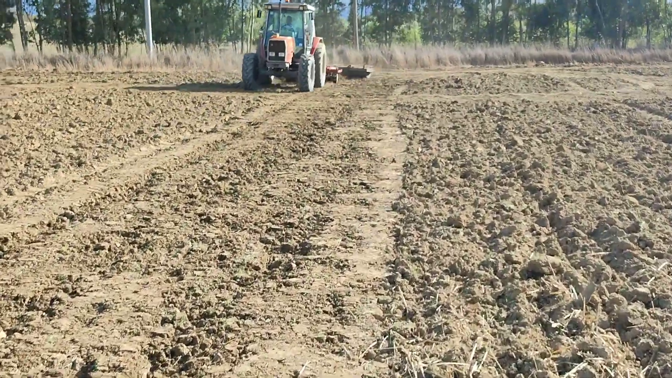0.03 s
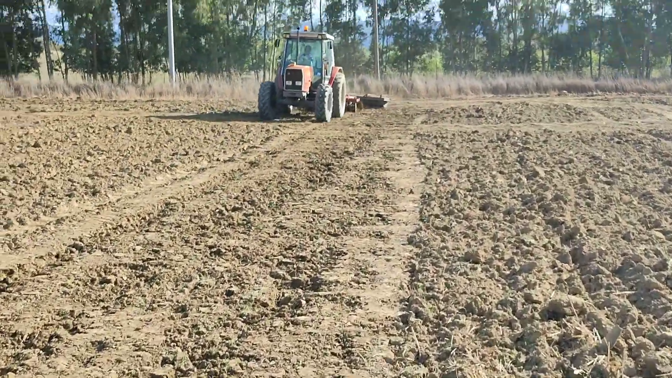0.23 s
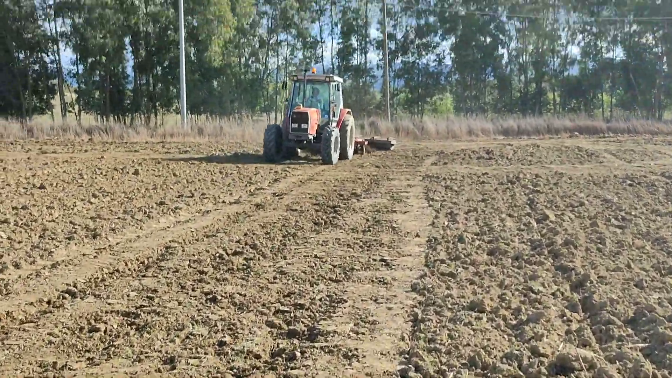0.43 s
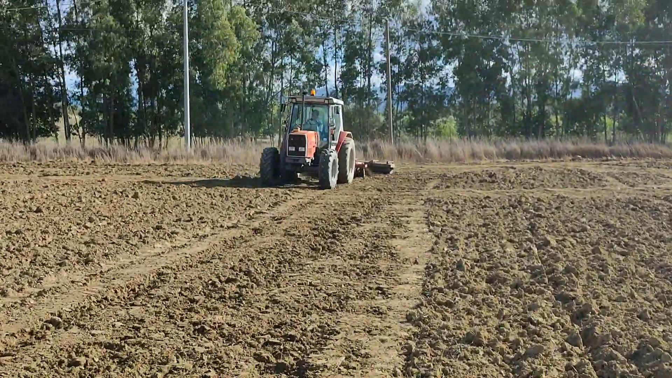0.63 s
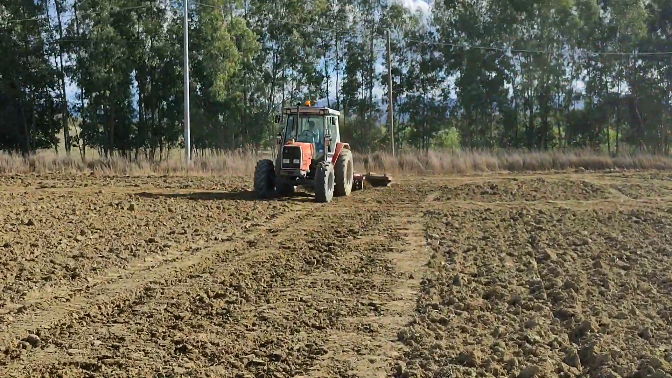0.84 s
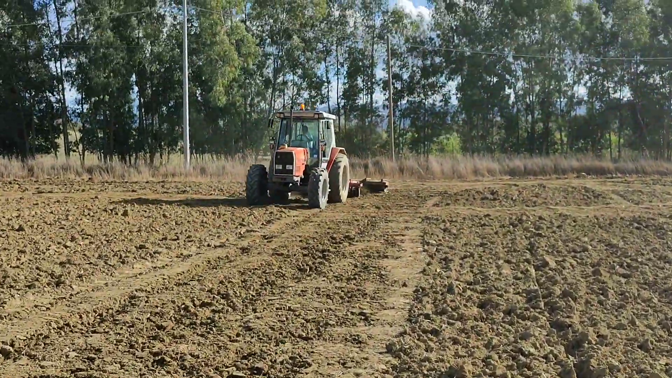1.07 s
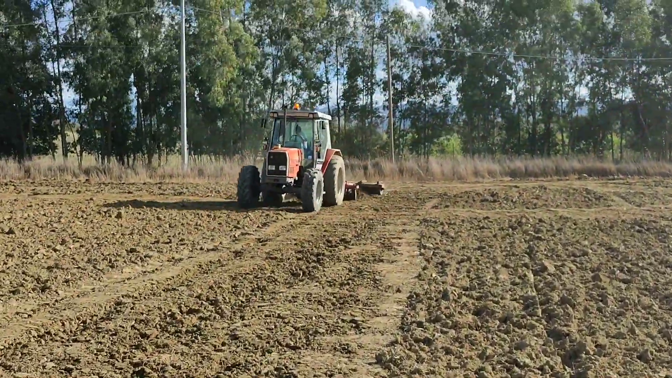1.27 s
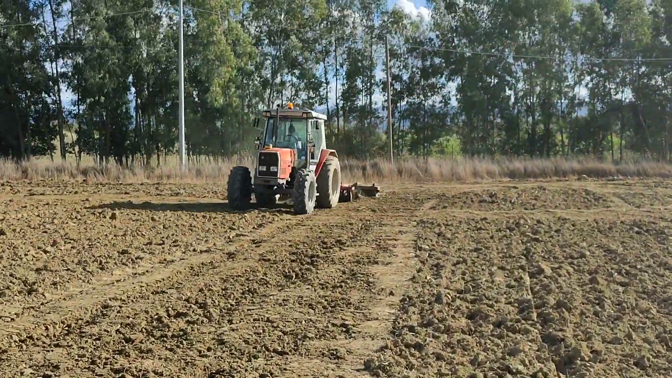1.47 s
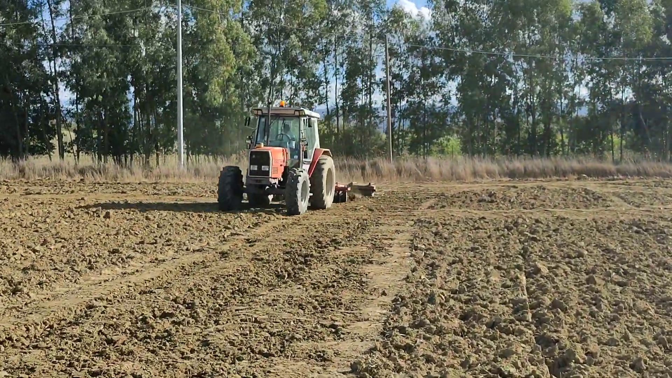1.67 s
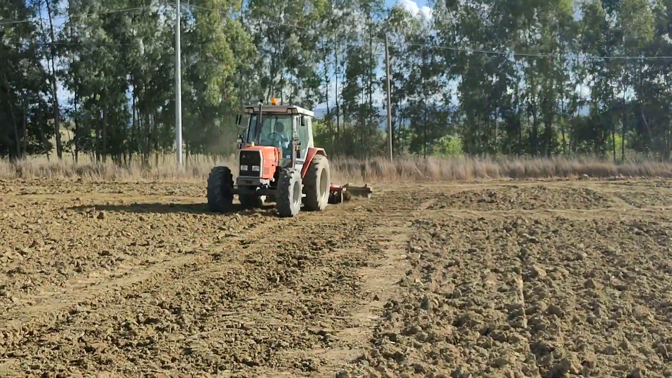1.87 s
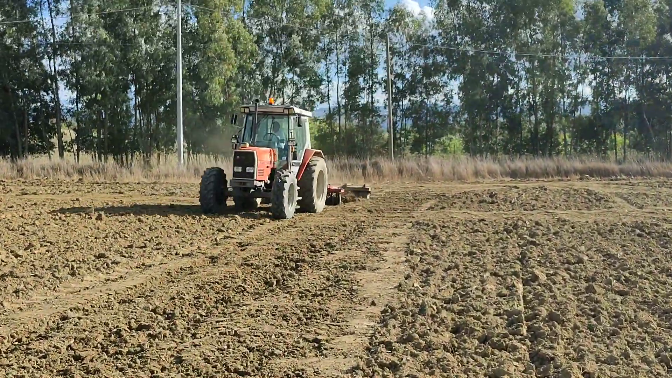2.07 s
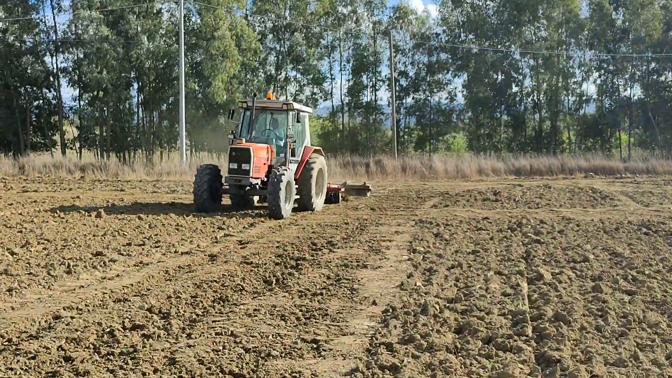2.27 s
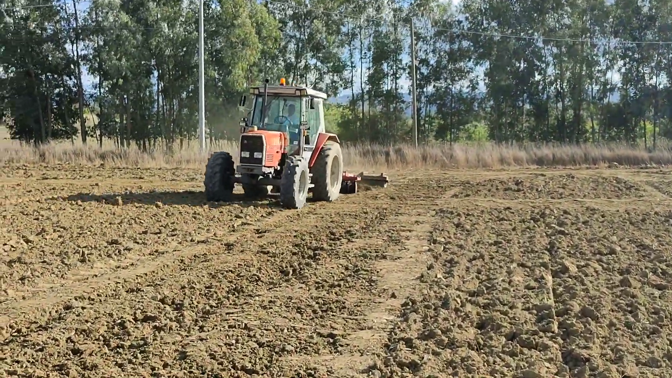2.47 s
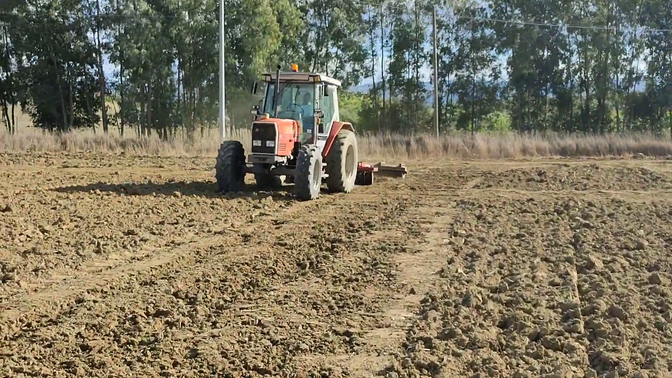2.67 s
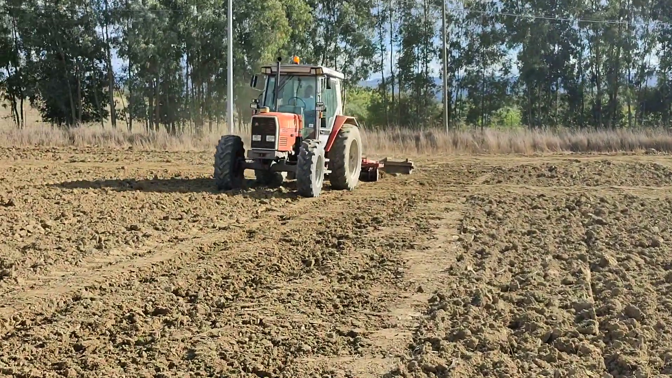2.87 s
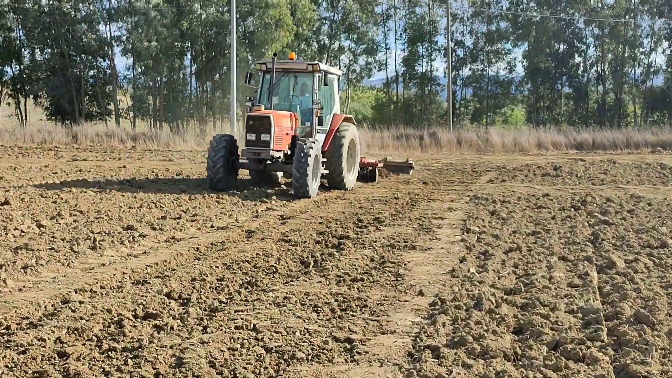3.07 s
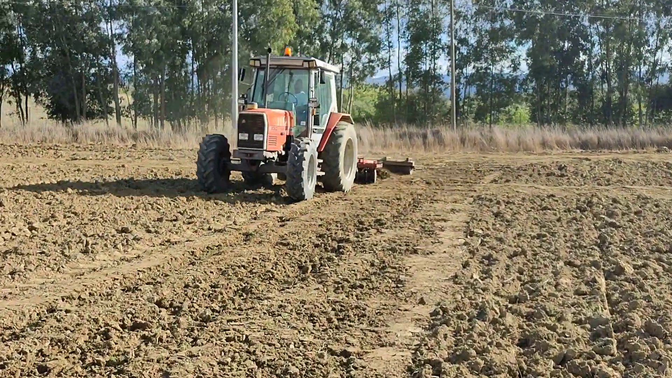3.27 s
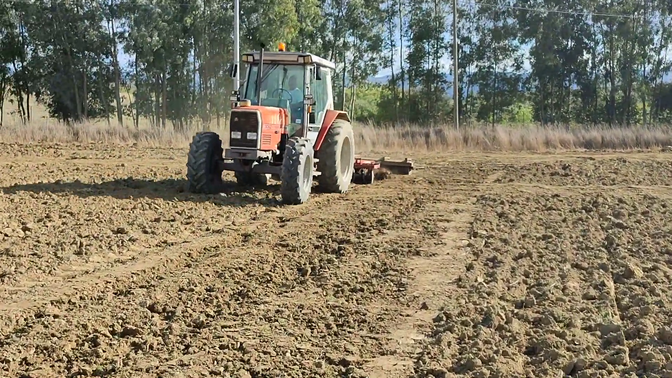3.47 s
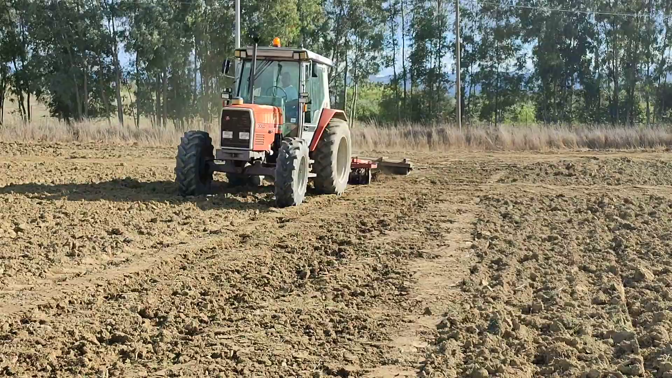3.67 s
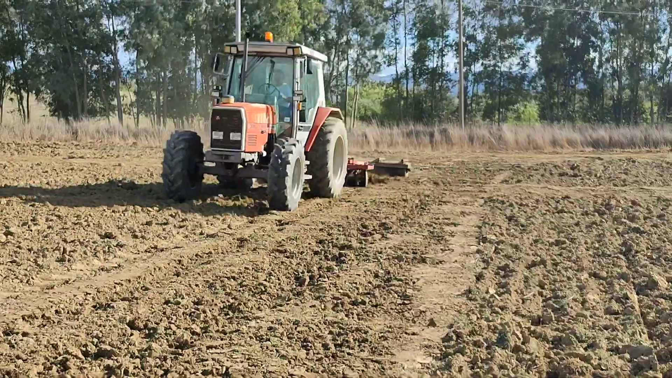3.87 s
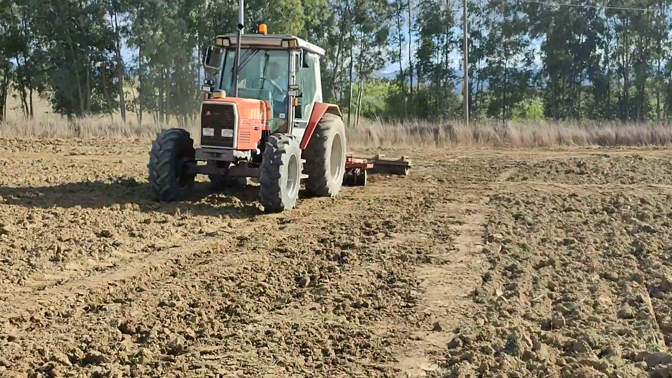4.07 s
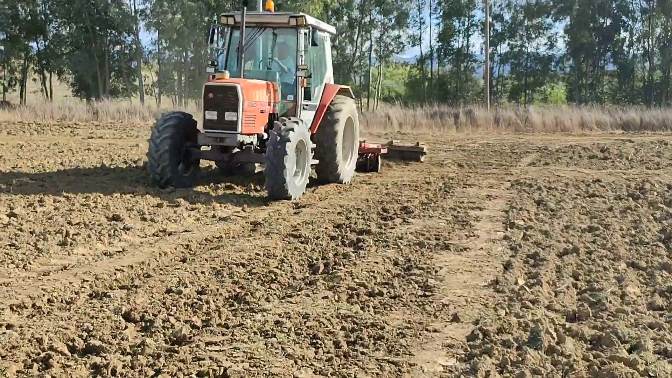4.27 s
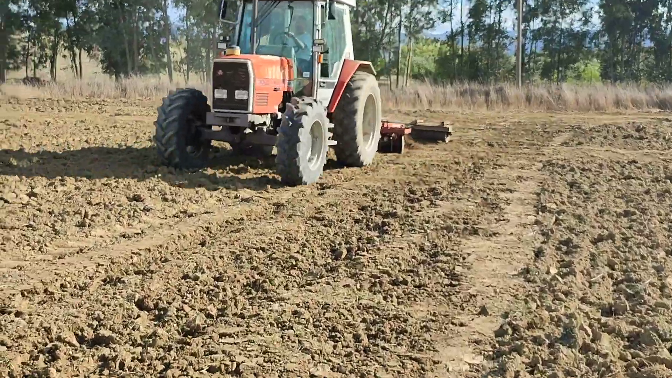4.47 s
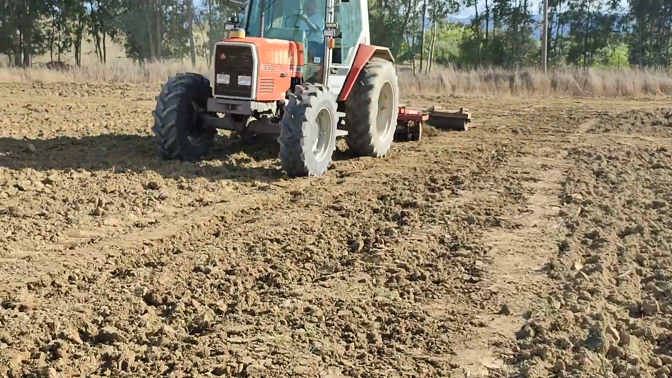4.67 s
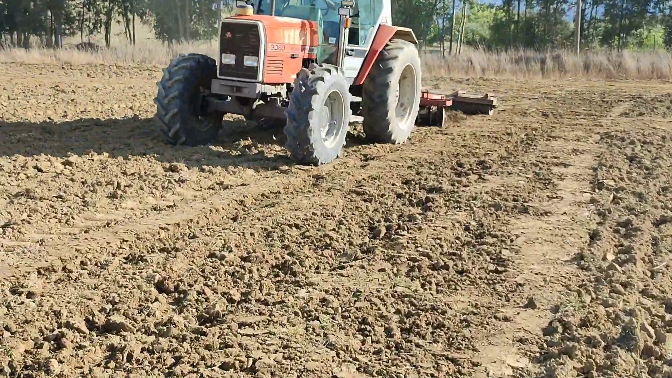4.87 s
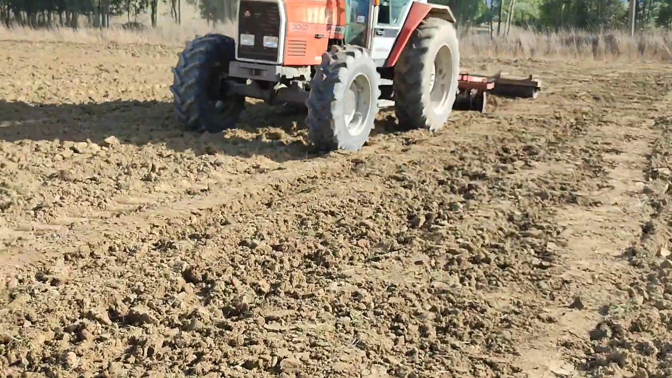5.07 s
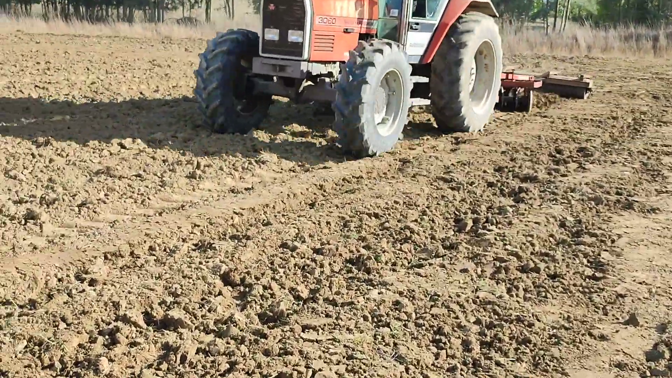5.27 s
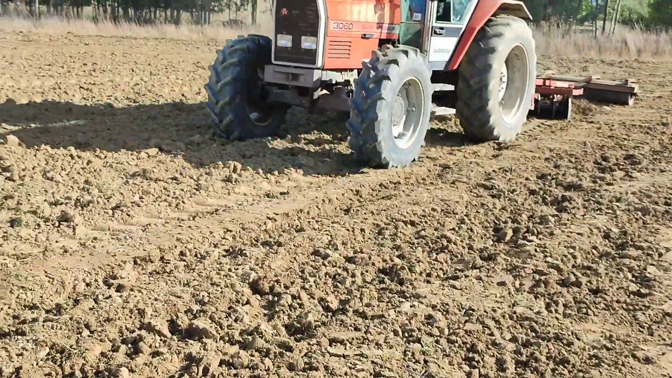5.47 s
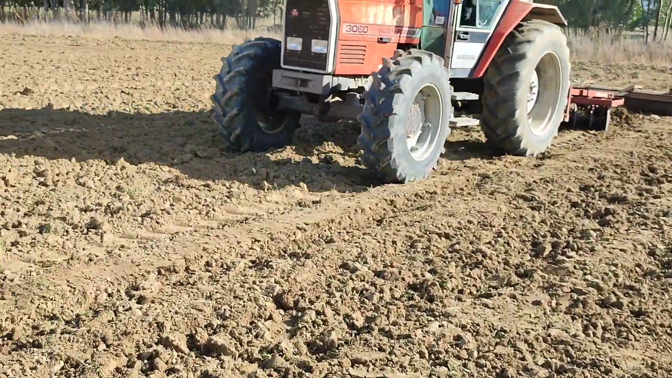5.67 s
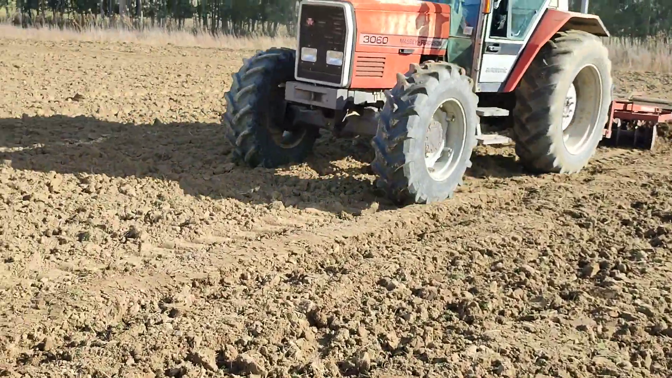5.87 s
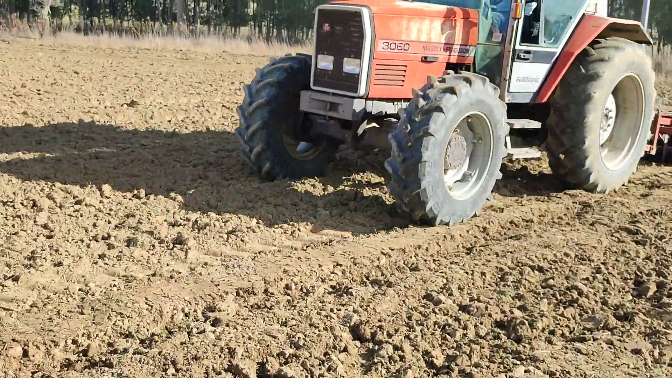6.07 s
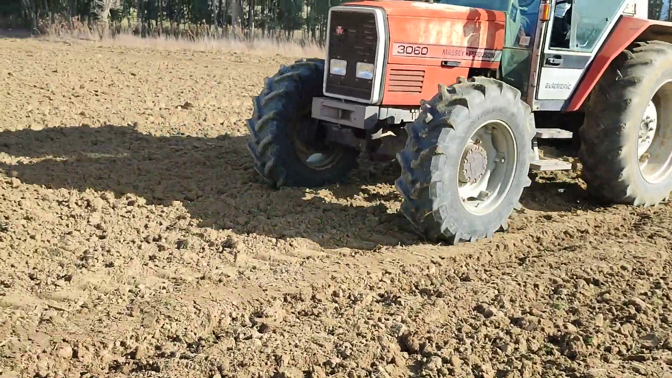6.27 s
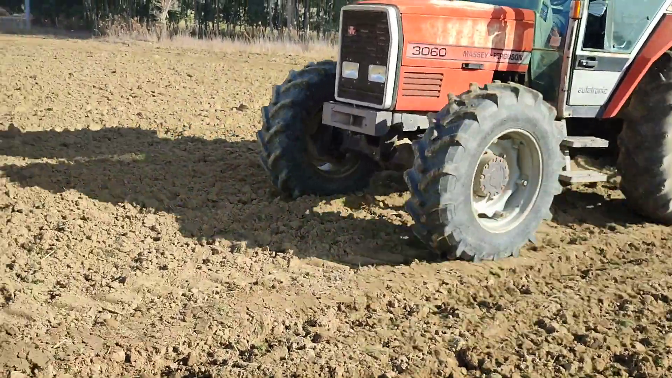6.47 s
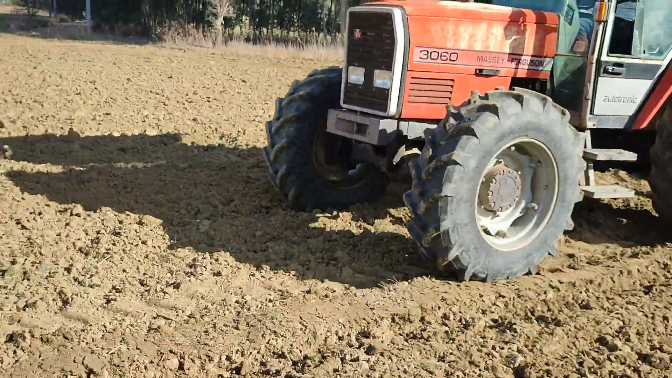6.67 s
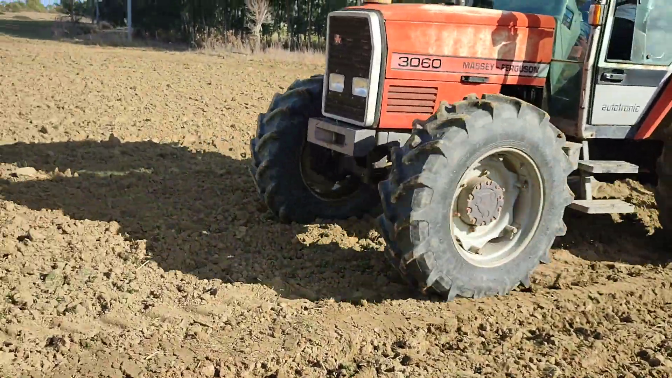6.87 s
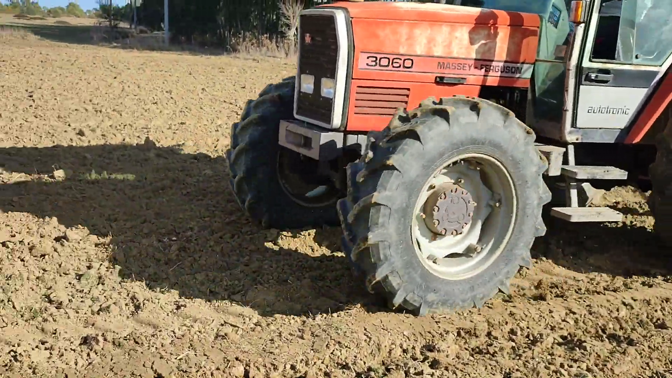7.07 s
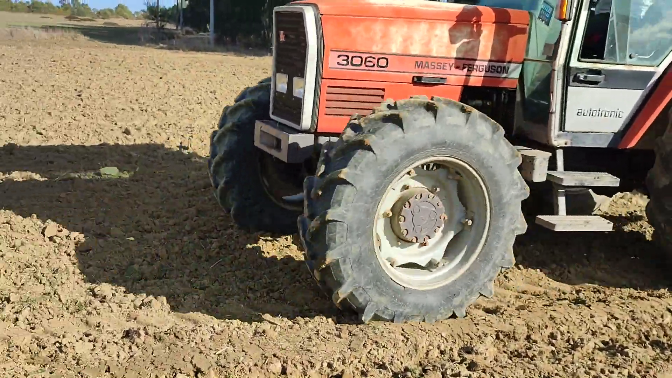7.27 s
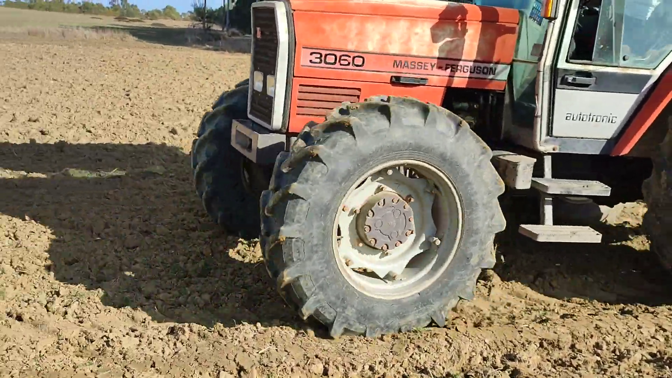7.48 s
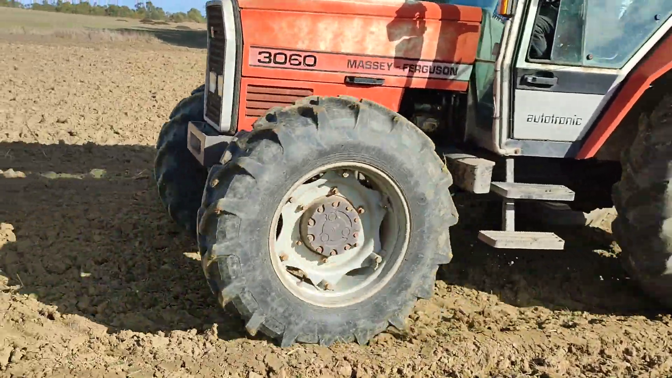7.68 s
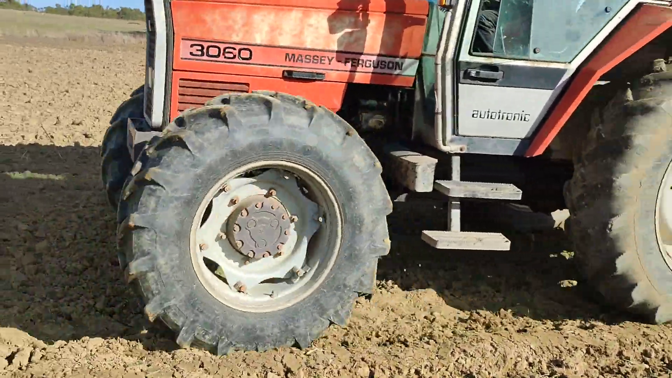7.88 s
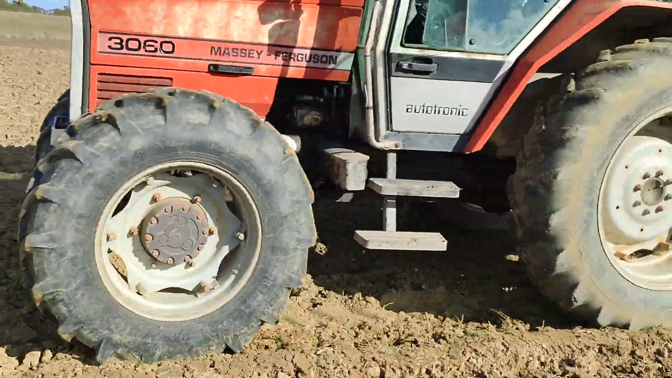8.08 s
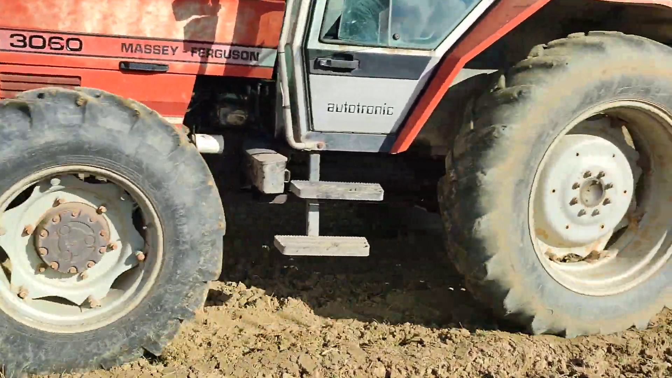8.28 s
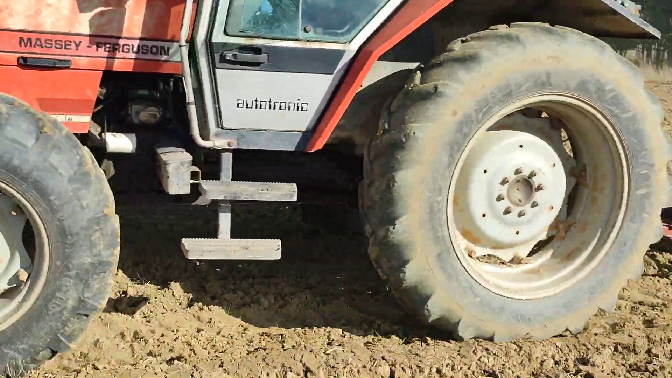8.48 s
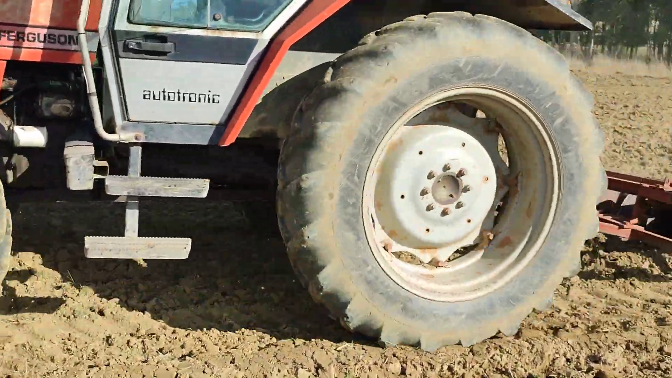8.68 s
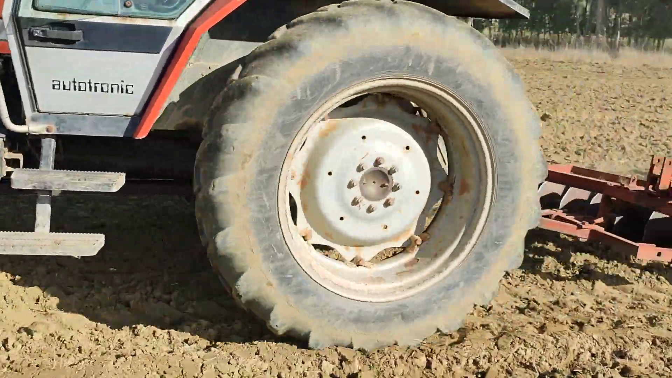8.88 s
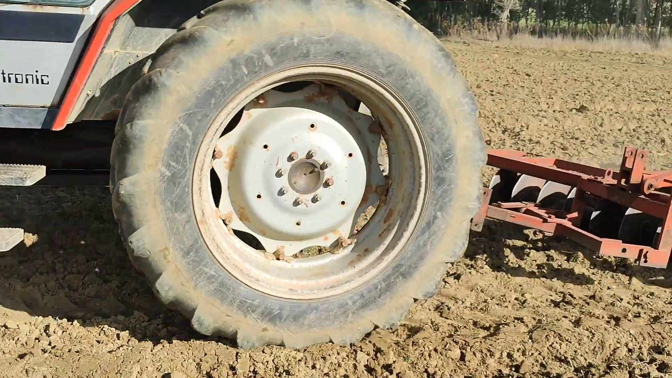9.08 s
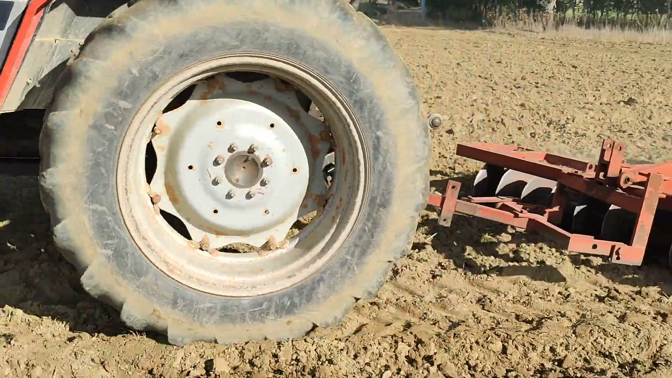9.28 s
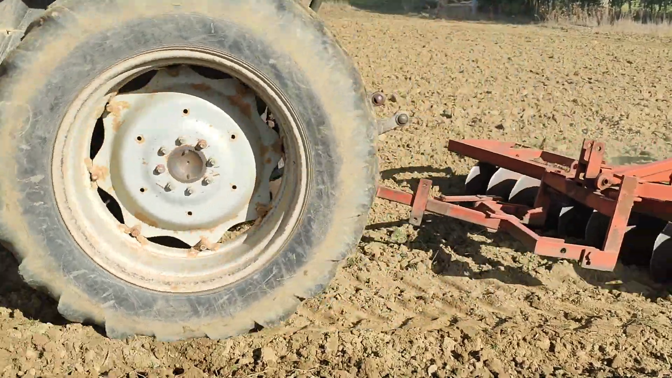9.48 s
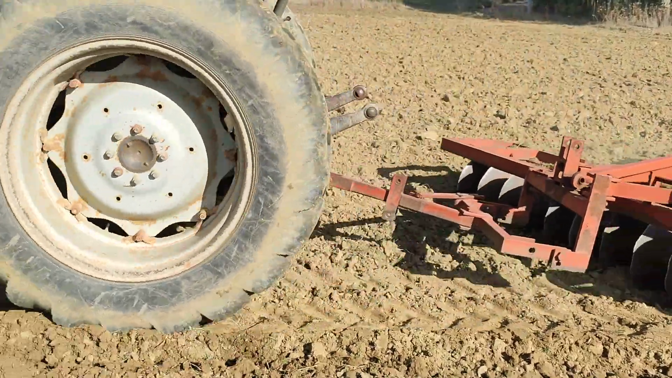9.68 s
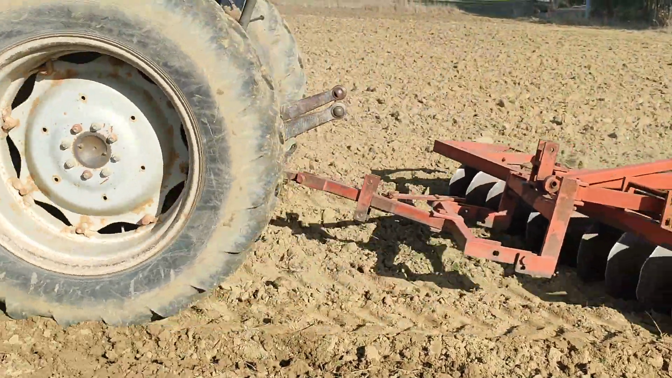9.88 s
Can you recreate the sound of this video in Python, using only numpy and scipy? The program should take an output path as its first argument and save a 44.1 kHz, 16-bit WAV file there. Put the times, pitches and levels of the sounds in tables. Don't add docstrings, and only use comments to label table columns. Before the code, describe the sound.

Hand-held microphone facing an approaching farm tractor on ploughed ground. A constant low exhaust hum with quick diesel clatter swells from distant to close. Rough wind buffeting covers it in bursts, strongest through the middle, with a few dull slaps on the left. Metallic ticks and a faint gear whine join up close, followed by a short rise in revs and a duller, settling engine as it passes.

```python
import sys
import numpy as np
from scipy import signal
from scipy.fft import rfft, irfft
from scipy.io import wavfile
from scipy.ndimage import uniform_filter1d, map_coordinates

SR = 44100
rng = np.random.default_rng(int(sys.argv[2]) if len(sys.argv) > 2 else 0)


def transcribe(u):
    v = np.clip(np.atleast_2d(u).T, -1, 1)
    q = np.round(v * 32767).astype(np.int16)
    wavfile.write(sys.argv[1], SR, q)


def ratio(d):
    e = np.asarray(d, float) / 20
    return 10 ** e


N = 437455
TIME = np.arange(N) / SR
HZ = np.maximum(np.arange(N // 2 + 1) * SR / N, 1)

# time_s, firing_hz
ENGINE_SPEED = [(0.0, 59.45), (0.6, 58.61), (1.2, 58.78), (2.0, 58.38), (3.0, 58.37), (4.0, 58.55),
                (5.0, 58.03), (6.0, 57.83), (7.0, 58.29), (7.7, 58.27), (8.05, 58.19), (8.25, 60.25),
                (8.45, 61.84), (8.7, 64.75), (8.84, 65.18), (9.0, 59.96), (9.3, 59.13), (9.92, 57.36)]
GOVERNED_HZ, SURGE_S = 58.4, 8.27
FIRST_TURN, CLATTER_LEAD = .29, .25
# time_s, distance_m, flank_share (side turned to the camera, 0-1)
APPROACH = [(0, 18.2, 0), (1, 16.4, 0), (2, 12.5, 0), (3, 10.8, 0), (4, 8.6, 0.1), (4.7, 6.95, 0.13),
            (5.2, 5.6, 0.45), (6, 4.73, 0.5), (6.6, 4.93, 0.52), (6.9, 4.04, 0.77), (7.6, 3.74, 0.87),
            (8.2, 3.1, 0.93), (9, 3.3, 0.59), (9.92, 4.18, 1)]
NEAREST_M = 3
BEHIND_CAB_S, BEHIND_FADE_S = 8.87, 0.024

EXHAUST_PHASES = [0.34, 1.7, 2.32, 1.27, 0.3]
# nearest_db, distance_loss_share, flank_db, surge_db_per_hz, behind_cab_db
EXHAUST_LEVELS = [
    (-15.5, 0.86, 0.4, -0.2, -2),
    (-27, 0.76, -13, 1.5, -8),
    (-45.5, 0.4, 19.5, 1.5, 2),
    (-43, 0.34, 26, 0.28, -3),
    (-35, 1.37, 9.5, -1.3, -8.5),
]
BEAM_POWERS = [1.1, 2.2, 1.12, 1.03, 4.8]

CYLINDERS_DB = [-9.5, -11.5, -7.5, -13]
# nearest_db, distance_loss_share, flank_db, surge_db_per_hz, behind_cab_db
CLATTER_LEVELS = [
    (-15.5, 1.88, -2.5, -0.13, 0),
    (-24, 0.97, -1.5, 0.65, 0.3),
    (-29, 1.06, 0.56, 0.33, 0.5),
    (-34.5, 1.205, -4, -0.13, -2),
    (-60.5, 1.52, 3, 1, 0),
]
# pitch_hz, level_db_per_hz
ENGINE_COLOUR = [(25, 1), (70, -8), (300, -2), (500, -2), (750, 1.5), (1400, -3.5), (1780, -5.5),
                 (2100, -5), (3000, -8.5), (4250, -12.5), (4700, -17.5), (8000, -19.5), (11000, -17),
                 (13900, -16), (14400, -41)]
# pitch_hz, common_share (0-1)
LIKENESS = [(60, 0.84), (600, 1), (1400, 0.58), (2800, 0.22), (6000, 0.33), (12000, 0.4)]
KNOCK_T60_S, KNOCK_JITTER_S = .028, .00012
# pitch_hz, level_db, t60_s
TIN_PARTS = [
    (1242, 10.5, 0.11),
    (2710, 6, 0.091),
    (3050, -31, .03),
    (3700, -12, 0.032),
    (4340, -12, 0.024),
    (6690, 2, 0.042),
    (7300, -8, 0.014),
    (7500, -20, .02),
]
# start_s, end_s, first_hz, last_hz, width_hz, over_knock_db
HOLLOWS = [(-1, 6, 2540, 2600, 100, -4.5), (1.2, 2.4, 3020, 3050, 90, -8), (4.2, 6.3, 2140, 2160, 150, -8),
           (6.7, 9, 2120, 2150, 150, -3.5), (7.85, 9.05, 2660, 2420, 220, -2),
           (-1, 1.1, 3610, 3600, 35, -3), (.85, 2.3, 4120, 4100, 90, -6), (.36, .66, 2680, 3120, 110, -1),
           (8.9, 10.6, 1780, 1660, 120, -2), (-1, 7.6, 3620, 3620, 50, -11), (-1, 5, 3050, 3050, 80, -9),
           (5, 7.4, 2900, 3200, 250, -7), (8.9, 9.6, 2350, 2300, 300, -4),
           (8.15, 8.95, 7000, 7300, 700, -6), (6.3, 7.3, 1700, 1780, 120, -6), (.5, 1, 1950, 1850, 110, -6),
           (7.92, 8.38, 2620, 2520, 280, -1), (5.5, 7.8, 1300, 1650, 130, -6)]
# time_s, peak_db
PANEL_TICKS = [(0.9817, -34), (1.0505, -34), (1.256, -39.5), (1.94, -34), (2.6933, -32), (2.9657, -39),
               (3.5319, -31), (3.5987, -37), (4.0093, -35), (4.3535, -33), (4.4223, -36), (4.4727, -27),
               (4.5441, -35), (4.56, -30), (4.8863, -35), (5.1951, -35), (5.5223, -37), (5.5752, -27),
               (5.5927, -33), (5.6446, -33), (5.661, -28), (5.8681, -31), (5.9184, -33), (5.9384, -32),
               (5.988, -21), (6.0581, -27), (6.4023, -35), (6.4562, -39), (6.539, -33), (6.6253, -38),
               (6.8324, -37), (6.8838, -32), (6.987, -32), (7.0204, -31), (7.0743, -36), (7.2614, -37),
               (7.2958, -30), (7.4495, -27), (7.4849, -36), (7.8431, -35), (7.9818, -39.5), (8.2023, -42),
               (8.2531, -39), (8.319, -35), (8.6946, -30), (8.8253, -29), (9.0483, -34), (9.0828, -32),
               (9.3521, -29.5), (9.832, -45)]
# time_s, peak_db
CLAMP_TICKS = [(5.0047, -31), (5.2112, -29), (5.2801, -36), (5.3309, -34), (5.4008, -35), (5.5729, -30),
               (5.6951, -30), (5.8882, -34), (5.9031, -30), (5.9196, -25), (5.939, -25), (5.9899, -26),
               (6.0408, -32), (6.0583, -23), (6.0927, -33), (6.1107, -27), (6.2254, -39), (6.3172, -24),
               (6.3506, -29), (6.3865, -33), (6.8151, -30), (6.8505, -32), (6.8674, -26), (6.8849, -23),
               (7.055, -33), (7.0735, -33), (7.0894, -26), (7.1254, -33), (7.2616, -27), (7.6671, -26),
               (7.8053, -32), (7.9455, -36), (7.9645, -33), (8.2703, -33), (8.2877, -26), (8.3965, -31),
               (8.4304, -32), (8.4479, -33), (8.4653, -29), (8.4967, -27), (8.591, -33), (8.609, -30),
               (8.6374, -30), (8.7023, -41), (8.7931, -27), (9.0665, -32), (9.1258, -32.5), (9.4875, -24),
               (9.6082, -35), (9.6421, -32)]
# start_s, end_s, first_hz, last_hz, level_db
WHINES = [
    (6.4, 6.7, 775, 775, -39),
    (6.9, 7.6, 716, 716, -34),
    (7.8, 8.2, 716, 720, -35),
    (8.45, 8.85, 750, 780, -36),
    (8.4, 8.95, 1340, 1450, -38),
]
GEAR_ORDER, GEAR_DB, GEAR_DB_PER_HZ = 8.35, -48, 3.4
# start_s, length_s, level_db
RUSTLES = [(0, 0.012, -56), (.38, 0.094, -74), (1.03, .14, -76), (1.33, 0.11, -76), (1.48, 0.33, -72),
           (2.2, 0.14, -74), (2.55, .08, -70), (2.98, 0.099, -71), (3.42, 0.22, -73), (4.12, .08, -76),
           (4.28, .08, -77), (4.62, 0.12, -68)]

SHIMMER_DB, SHIMMER_HZ, SHIMMER_S = 1.8, 120, 0.25
# start_s, end_s, first_hz, last_hz, change_db
SHADOWS = [(-1, 5.4, 2240, 2180, -7), (-0.5, .62, 1760, 1780, -14), (2.5, 7.4, 1650, 2230, -6.5),
           (4, 9.1, 4740, 4200, -7.5), (-1, .6, 2100, 2020, -7), (0.7, 3, 1980, 1980, -2),
           (.7, 1.4, 4000, 3800, -9), (6.5, 9.8, 440, 520, -12), (1.5, 1.92, 2100, 2120, -18),
           (2.2, 2, 3740, 3740, -10), (1, 2, 3330, 3240, -9), (8.5, 8.55, 1760, 1800, 7)]
SHADOW_WIDTH_HZ = 90
# time_s, echo_delay_ms, echo_share (0-1), right_lag_samples, left_right_db
PATH = [
    (0, 1.56, 0.54, 3.75, -0.5),
    (3.5, 1.71, 0.67, 4.45, 0),
    (5.5, 1.52, 0.56, 5.9, 1),
    (7, 1.41, 0.34, 2.33, -0.5),
    (7.9, 1.34, 0.22, 3.5, -0.5),
    (8.3, 1.57, 0.34, 12, 0),
    (9, 0.74, 0.03, 16, -0.5),
    (9.92, 1.31, 0.38, 19.7, -1),
]
SOIL_TURN = 1

# start_s, length_s, level_db
LEFT_GUSTS = [(.3, 0.11, -23.5), (.45, 0.17, -21.5), (.65, 0.19, -14), (.84, 0.23, -14.5),
              (1.06, 0.21, -21.5), (1.36, 0.23, -25), (1.65, 0.097, -24), (1.8, 0.084, -24),
              (2.53, 0.11, -24), (2.64, 0.22, -21), (2.8, 0.23, -25), (3.03, 0.12, -22),
              (3.13, 0.16, -20.5), (3.35, 0.23, -16.5), (3.445, 0.17, -15.5), (3.6, 0.33, -15.5),
              (3.91, 0.2, -16.5), (4.1, 0.22, -14), (4.22, 0.59, -14), (4.84, 0.24, -12), (5.05, 0.58, -14),
              (5.65, 0.2, -15.5), (5.93, 0.54, -15), (6.6, 0.32, -14), (6.92, 0.15, -16), (7.05, 0.59, -16),
              (7.66, 0.57, -15), (8.1, 0.45, -20), (9.0, 0.45, -15.5), (9.5, 0.44, -24)]
# start_s, length_s, level_db
RIGHT_GUSTS = [(.75, 0.21, -33), (.93, 0.097, -25), (1.46, 0.095, -30), (1.657, 0.073, -36),
               (2.472, 0.22, -46), (3.053, 0.11, -28), (3.155, 0.29, -31), (3.45, 0.37, -32),
               (4.052, 0.13, -22.5), (4.337, 0.088, -23), (4.66, 0.25, -19), (5.047, 0.13, -19),
               (5.147, 0.19, -23), (5.643, 0.41, -16), (6.024, 0.12, -22), (6.345, 0.26, -14.5),
               (6.553, 0.32, -15), (6.768, 0.16, -17), (7.062, 0.19, -20), (7.395, 0.64, -18.5),
               (7.95, .1, -31), (8.048, 0.136, -17), (8.14, 0.31, -15.5), (8.548, 0.73, -17.5),
               (9.15, 0.22, -31), (9.437, 0.069, -25), (9.647, 0.13, -17)]
GUST_EDGE_S, CALM_DB = 0.031, -49
# time_s, rasp_db, thump_db
LEFT_EDDIES = [(0.366, -38, -19.5), (0.655, -22, -21.5), (0.728, -22, -12), (0.788, -16.5, -18),
               (0.835, -16, -23), (0.913, -16, -14), (0.976, -19, -13.5), (1.04, -21, -18),
               (1.139, -26.5, -29), (2.656, -25, -18), (2.723, -35, -12), (2.86, -31, -18.5),
               (3.063, -28, -13.5), (3.45, -25, -15), (3.475, -13.5, -14), (3.525, -22, -34),
               (3.554, -29, -16), (3.67, -26, -23), (3.708, -19.5, -22), (3.925, -14.5, -27),
               (3.95, -18, -25), (3.988, -9.5, -18), (4.028, -13.5, -30), (4.252, -17, -28),
               (4.275, -17, -40), (4.326, -15.5, -33), (4.369, -11.5, -24), (4.416, -13, -32),
               (4.447, -14, -21.5), (4.502, -14, -28), (4.526, -23, -25), (4.584, -12, -23),
               (4.629, -15, -12), (4.704, -12.5, -12), (4.749, -30, -24), (4.781, -10.5, -18),
               (4.848, -21, -21), (4.878, -15, -29), (4.909, -12, -18), (4.999, -12.5, -19),
               (5.093, -24, -13), (5.276, -16, -17), (5.451, -21, -13), (5.523, -24, -35),
               (5.727, -18, -14), (5.795, -15.5, -14.5), (5.915, -14, -20), (5.968, -15, -12),
               (6.081, -15, -21), (6.122, -21, -10), (6.223, -15, -12), (6.267, -23, -10.5),
               (6.319, -18, -13), (6.36, -13, -12), (6.493, -21, -23), (6.517, -23, -13), (6.776, -9.5, -9),
               (6.948, -14, -11), (7.888, -25, -13), (9.541, -21, -10)]
# time_s, rasp_db, thump_db
RIGHT_EDDIES = [(0.37, -41, -44), (0.972, -35, -32), (4.37, -21, -27), (4.822, -22, -18), (5.228, -24, -22),
                (5.433, -34, -25), (5.663, -28, -24), (5.717, -27, -26), (5.788, -18, -19),
                (5.877, -26, -26), (5.926, -21, -17), (5.949, -25, -21), (5.989, -28, -12),
                (6.05, -20, -11), (6.084, -27, -13), (6.108, -20, -17), (6.166, -24, -28),
                (6.255, -16, -19), (6.317, -20, -23), (6.383, -26, -24), (6.407, -32, -26),
                (6.451, -23, -22), (6.548, -28, -20), (6.859, -29, -11), (7.72, -25, -18),
                (9.018, -19, -23), (9.126, -22, -19), (9.218, -19, -18.5), (9.309, -26, -18),
                (9.349, -31, -19.5), (9.376, -27, -31), (9.442, -24, -35), (9.465, -31, -21.5),
                (9.487, -23, -24), (9.667, -29, -24), (9.903, -37.5, -24)]
EDDY_RISE_S, EDDY_FALL_S, THUMP_S = .012, .015, .016
# time_s, peak_db
SLAPS = [
    (3.988, -6),
    (4.117, -3),
    (4.5, -1),
    (4.778, 2),
    (6.776, 4),
]
# time_s, peak_db
GRIT = [
    (1.406, -50),
    (2.244, -46),
    (2.6, -48),
    (3.097, -37),
    (3.103, -43),
    (3.543, -41),
    (3.711, -56),
]
# start_s, end_s, change_db
DUCKS = [
    (1.198, 1.32, -0.5),
    (2.678, 2.875, -1.5),
    (4.757, 4.893, -4),
    (5.777, 5.893, -2.5),
    (7.564, 7.636, -2),
    (8.18, 8.27, -1.5),
    (8.908, 9.03, -2),
]

# pitch_hz, level_db
LEFT_PORT = [(20, 2.5), (8300, -0.5), (9100, -7.5), (9600, -24), (10500, -23), (11500, -16.5), (15000, -18)]
# pitch_hz, level_db
RIGHT_PORT = [(20, 1), (300, 0.5), (700, 0.1), (1250, 2.5), (2300, -2), (4200, -1.5), (5500, -2.5),
              (6500, -11.5), (7300, -9), (8100, -29), (8800, -34), (9400, -15), (12000, -17),
              (15000, -13.5)]
# pitch_hz, level_db
DROP_OUT = [(1500, -16), (2500, -14.5), (4300, -12), (4800, -8.5), (5400, -11.5), (6000, -15), (7500, -19),
            (10000, -22), (13200, -23), (13700, -14), (14300, -14), (14500, -27)]


def rms_one(x):
    return x / np.sqrt(np.mean(x ** 2) + 1e-20)


def in_time(rows):
    s, *columns = np.transpose(rows)
    return [np.interp(TIME, s, column) for column in columns]


def at_hz(points):
    hz, value = np.transpose(points)
    return np.interp(np.log(HZ), np.log(hz), value)


def shaped(x, gain):
    return irfft(rfft(x) * gain, N)


def drift(rate_hz):
    return rms_one(shaped(rng.standard_normal(N), 1 / (1 + (HZ / rate_hz) ** 2)))


def delayed(x, samples):
    return np.interp(np.arange(N) - samples, np.arange(N), x)


def evened(x, window_s):
    power = uniform_filter1d(x ** 2, size=round(window_s * SR))
    return rms_one(x / power.clip(1e-6) ** .35)


def ring(clicks, hz, t60_s):
    decay = ratio(-60 / (t60_s * SR))
    turn = 2 * np.pi * hz / SR
    return signal.lfilter([0, np.sin(turn)], [1, -2 * decay * np.cos(turn), decay * decay], clicks + 1e-18)


def knocks(events, hz, t60_s, trim_db):
    clicks = np.zeros(N)
    s, peak_db = np.transpose(events)
    clicks[(s * SR).astype(int)] = ratio(peak_db + trim_db) * rng.choice([-1, 1], len(s))
    return ring(clicks, hz, t60_s)


def rise_and_fall(part):
    return np.sin(np.pi * part).clip(0) ** .5


def glide(start, end, first_hz, last_hz, unsteady_hz):
    part = np.clip((TIME - start) / (end - start), 0, 1)
    hz = first_hz + (last_hz - first_hz) * part + unsteady_hz
    return 2 * np.pi * np.cumsum(hz) / SR, rise_and_fall(part)


def swells(rows, edge_s, floor_db):
    power = ratio(floor_db) ** 2
    for start, length, level_db in rows:
        inside_s = np.minimum(TIME - start, start + length - TIME)
        gate = np.clip(inside_s / edge_s + .5, 0, 1)
        power = power + (ratio(level_db) * gate ** 2) ** 2
    return 10 * np.log10(power)


def engine_levels(rows, firing_hz, powers):
    metres, flank = in_time(APPROACH)
    loss_db = -20 * np.log10(metres / NEAREST_M)
    surge = (firing_hz - GOVERNED_HZ).clip(0)
    hidden = .5 + .5 * np.tanh((TIME - BEHIND_CAB_S) / BEHIND_FADE_S)
    levels = []
    for (base_db, share, flank_db, surge_db, behind_db), power in zip(rows, powers):
        facing_db = flank_db * flank.clip(0) ** power
        levels.append(base_db + share * loss_db + facing_db + surge_db * surge + behind_db * hidden)
    return levels


def exhaust(turns, levels_db):
    out = 0
    for k, level_db in enumerate(levels_db):
        waver = EXHAUST_PHASES[k] + 0.05 * (k + 1) * drift(6.0)
        height = np.sqrt(2) * ratio(level_db + 0.6 * drift(10.0))
        out = out + height * np.cos(2 * np.pi * (k + 1) * turns + waver)
    return out


def bursts(turns, depth, sharp, spread_db):
    firing = turns.astype(int)
    chance_db = spread_db * rng.standard_normal(1000).clip(-3, 1.3)[firing]
    strength_db = np.array(CYLINDERS_DB)[firing % 4] + chance_db
    swell = np.sin(np.pi * (turns % 1) ** 0.85) ** (2 * sharp)
    return rms_one(1 - depth + depth * ratio(strength_db) * swell)


def clatter(turns, levels_db):
    alike = np.clip(at_hz(LIKENESS), 0, 1)
    common, own = rfft(rng.standard_normal((2, N))) * ratio(at_hz(ENGINE_COLOUR))
    pair = np.array([common, alike * common + np.sqrt(1 - alike ** 2) * own])
    under = [1 / (1 + (HZ / hz) ** 8) for hz in (480, 1650, 4500, 9500)]
    ranges = np.sqrt(np.diff([0 * HZ] + under + [1 + 0 * HZ], axis=0).clip(0))
    depths = (0.23, 0.45, 0.42, 0.64, 0.3)
    out = 0
    for weight, level_db, depth in zip(ranges, levels_db, depths):
        noise = rms_one(irfft(pair * weight, N))
        level = ratio(level_db + 0.7 * drift(15.0))
        out = out + level * bursts(turns, depth, sharp=0.9, spread_db=2.5) * noise
    return out


def diesel_knock(turns, level_db):
    at = np.flatnonzero(np.diff(turns.astype(int)))
    jitter = KNOCK_JITTER_S * SR * rng.standard_normal(1000)[:len(at)]
    at = (at + jitter).astype(int).clip(0, N - 1)
    strength = ratio(2.0 * rng.standard_normal(1000))
    after = TIME[:2000]
    envelope = np.minimum(after / .0008, 1) * ratio(-60 * after / KNOCK_T60_S)
    answers = rng.standard_normal((5, 2000)) * envelope
    out = 0
    for cylinder, cylinder_db in enumerate(CYLINDERS_DB):
        clicks = np.zeros(N)
        moments = at[cylinder::4]
        clicks[moments] = ratio(cylinder_db) * strength[cylinder::4][:len(moments)]
        out = out + signal.fftconvolve(clicks, answers[4] + .6 * answers[cylinder])[:N]
    colour = ratio(at_hz(ENGINE_COLOUR)) / (1 + (520 / HZ) ** 6) / (1 + (HZ / 4400) ** 6)
    return ratio(level_db) * rms_one(shaped(out, colour))


def tin(turns, level_db):
    at = np.flatnonzero(np.diff(turns.astype(int))) + round(.003 * SR)
    at = at[at < N]
    out = 0
    for hz, mode_db, t60_s in TIN_PARTS:
        clicks = np.zeros(N)
        hardness_db = 4.9 * rng.exponential(1, 1000)[:len(at)].clip(0, 4)
        sign = rng.choice([-1, 1], 1000)[:len(at)]
        clicks[at] = ratio(mode_db + hardness_db) * sign
        out = out + ring(clicks, hz, t60_s)
    return ratio(level_db) * rms_one(out)


def hollows(turns, knock_db):
    out = 0
    for start, end, first_hz, last_hz, width_hz, over_db in HOLLOWS:
        phase, swell = glide(start, end, first_hz, last_hz, 0)
        band = drift(width_hz) * np.cos(phase) + drift(width_hz) * np.sin(phase)
        out = out + ratio(over_db + 0.6 * drift(1.9)) * swell * band
    return ratio(knock_db) * bursts(turns, 0.45, sharp=1.3, spread_db=1.5) * out


def loose_parts():
    panel = knocks(PANEL_TICKS, 4180, 0.033, trim_db=10.5)
    clamp = knocks(CLAMP_TICKS, 6760, 0.022, trim_db=4.0) + knocks(CLAMP_TICKS, 7960, 0.02, trim_db=1.0)
    return shaped(panel + clamp, 1 - .8 * np.exp(-((HZ - 5400) / 900) ** 2))


def whine():
    out = 0
    for start, end, first_hz, last_hz, level_db in WHINES:
        phase, swell = glide(start, end, first_hz, last_hz, 3.63 * drift(8.1))
        out = out + ratio(level_db + 1.5 + 1.4 * drift(6.0)) * swell * np.sin(phase)
    return np.sqrt(2) * out


def gear(turns, firing_hz):
    surge_db = np.minimum(GEAR_DB_PER_HZ * (firing_hz - GOVERNED_HZ), 17)
    outside_s = np.maximum(TIME - BEHIND_CAB_S, SURGE_S - TIME)
    fade_db = -30 * np.clip(outside_s * 10, 0, 1) ** 2
    level_db = GEAR_DB + surge_db + 1.2 * drift(7.0) + fade_db
    return np.sqrt(2) * ratio(level_db) * np.sin(2 * np.pi * GEAR_ORDER * turns)


def shimmer(pair):
    hz, s, cells = signal.stft(pair, fs=SR, nperseg=1024)
    chance = rng.standard_normal((300, 100))
    places = np.meshgrid(hz / SHIMMER_HZ, s / SHIMMER_S, indexing="ij")
    patches = map_coordinates(chance, places, order=3)
    depth_by_hz = SHIMMER_DB / (1 + (1200 / (hz + 1)) ** 2)
    gain_db = depth_by_hz[:, None] * patches
    for start, end, first_hz, last_hz, change_db in SHADOWS:
        part = np.clip((s - start) / (end - start), 0, 1)
        off = (hz[:, None] - first_hz - (last_hz - first_hz) * part) / SHADOW_WIDTH_HZ
        gain_db = gain_db + change_db * rise_and_fall(part) * np.exp(-off ** 2)
    return signal.istft(cells * ratio(gain_db), fs=SR, nperseg=1024)[1][:, :N]


def passing(pair):
    echo_ms, share, lag, pan_db = in_time(PATH)
    dull = shaped(pair, np.exp(1j * SOIL_TURN) / np.sqrt(1 + (HZ / 2200) ** 4))
    ms = SR / 1000
    left = pair[0] + 0.57 * share * delayed(dull[0], (echo_ms - .05) * ms)
    right = pair[1] + share * delayed(dull[1], echo_ms * ms)
    return np.array([left * ratio(pan_db / 2), delayed(right, lag) * ratio(-pan_db / 2)])


def ducking():
    gain_db = 0
    for start, end, change_db in DUCKS:
        part = np.clip((TIME - start) / (end - start), 0, 1)
        gain_db = gain_db + change_db * rise_and_fall(part)
    return ratio(gain_db)


def wind(gust_db, eddies):
    lumps_db = np.clip(1.5 * drift(24.0) + 2.6 * drift(85.0), -20, 4)
    low_colour = (HZ / 30) / (1 + HZ / 30) / (1 + (HZ / 190) ** 2.2)
    rasp_colour = (HZ / 250) / (1 + (HZ / 520) ** 4.4)
    low = rms_one(shaped(rng.standard_normal(N), low_colour))
    rasp = rms_one(shaped(rng.standard_normal(N), rasp_colour))
    low = evened(low, .035)
    rasp = evened(rasp, .014) * ratio(np.clip(2.0 * drift(170.0), -12, 7) - .6)
    low_gain = ratio(gust_db - 5.5 + lumps_db)
    rasp_gain = ratio(2.46 * (gust_db + 15.5) + lumps_db - 34.0)
    for s, rasp_db, thump_db in eddies:
        near = slice(max(int(s * SR) - 3000, 0), int(s * SR) + 3000)
        late = TIME[near] - s
        edge_s = np.where(late < 0, EDDY_RISE_S, EDDY_FALL_S)
        burst = ratio(rasp_db - 1.5) * np.exp(-(late / edge_s) ** 2)
        thump = ratio(thump_db - 0.5) * np.exp(-(late / THUMP_S) ** 2)
        rasp_gain[near] = np.hypot(rasp_gain[near], burst)
        low_gain[near] = np.hypot(low_gain[near], thump)
    return low_gain * low + rasp_gain * rasp


def slaps():
    return shaped(knocks(SLAPS, 440, 0.0061, trim_db=-7.0), 1 / (1 + (HZ / 1300) ** 4))


def thud(gust_db):
    deep = shaped(rng.standard_normal((2, N)), (HZ / 25) / (1 + (HZ / 55) ** 3))
    return ratio(0.17 * (gust_db + 17.0) - 30.5) * rms_one(deep)


def grit():
    return knocks(GRIT, 10500, .0015, trim_db=27) + knocks(GRIT, 15000, .002, trim_db=5)


def scene():
    firing_hz, = in_time(ENGINE_SPEED)
    turns = FIRST_TURN + np.cumsum(firing_hz) / SR
    early = turns + CLATTER_LEAD
    hum = exhaust(turns, engine_levels(EXHAUST_LEVELS, firing_hz, BEAM_POWERS))
    hum = np.array([ratio(1.1) * hum, ratio(1.4) * delayed(hum, 4.7)])

    rumble_db, block_db, knock_db, rattle_db, hiss_db = engine_levels(CLATTER_LEVELS, firing_hz, np.ones(5))
    hiss_db = swells(RUSTLES, .04, hiss_db)
    layers_db = (rumble_db - 3.5, block_db - 3.5, knock_db, rattle_db + 6.5, hiss_db + 25.0)
    noise = clatter(early, layers_db) + diesel_knock(early + .9, block_db - 3.5)
    body = noise + tin(early, knock_db - 6.5) + hollows(early, knock_db)
    machine = shimmer(body) + loose_parts() + whine() + gear(turns, firing_hz)
    engine = ducking() * passing(machine)

    left_db = swells(LEFT_GUSTS, GUST_EDGE_S, CALM_DB)
    right_db = swells(RIGHT_GUSTS, GUST_EDGE_S, CALM_DB)
    ports = np.array([wind(left_db, LEFT_EDDIES), wind(right_db, RIGHT_EDDIES)])
    ports = ports + thud(np.maximum(left_db, right_db))
    ports[0] += slaps()
    return engine + hum + ports + grit()


def thin_out(x, spread_db):
    frames = dict(fs=SR, window="cosine", nperseg=2048, noverlap=1024)
    hz, _, cells = signal.stft(x, **frames)
    power = uniform_filter1d(np.abs(cells) ** 2, size=3, axis=1)
    mid_treble = power[:, (hz > 2000) & (hz < 6000)].mean((0, 1))
    treble = uniform_filter1d(mid_treble, size=8)
    chance = rng.standard_normal((2, 65, cells.shape[2] // 2 + 1))
    chance = chance.repeat(16, 1).repeat(2, 2)[:, :len(hz), :cells.shape[2]]
    bar_db = np.interp(hz, *np.transpose(DROP_OUT))[:, None] + spread_db * chance
    kept = cells * (power > treble * ratio(bar_db) ** 2)
    return signal.istft(kept, **frames)[1][:, :N]


def top_cut(x):
    return signal.sosfilt(signal.butter(12, 15800, fs=SR, output="sos"), x)


def record(dry):
    colour = ratio([at_hz(LEFT_PORT), at_hz(RIGHT_PORT)])
    coloured = shaped(dry, colour / (1 + (14 / HZ) ** 4))
    rounded = coloured / (1 + (coloured / .92) ** 4) ** (1 / 4)
    finished = thin_out(rounded, spread_db=4.0)
    return top_cut(finished)


dry = scene()
out = record(dry)
transcribe(out)
```